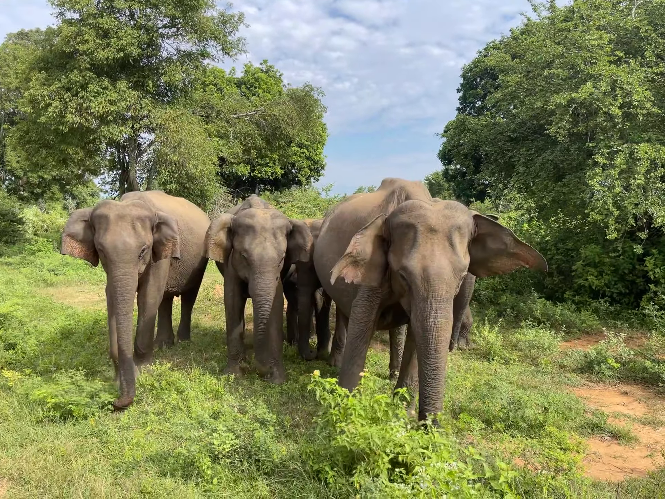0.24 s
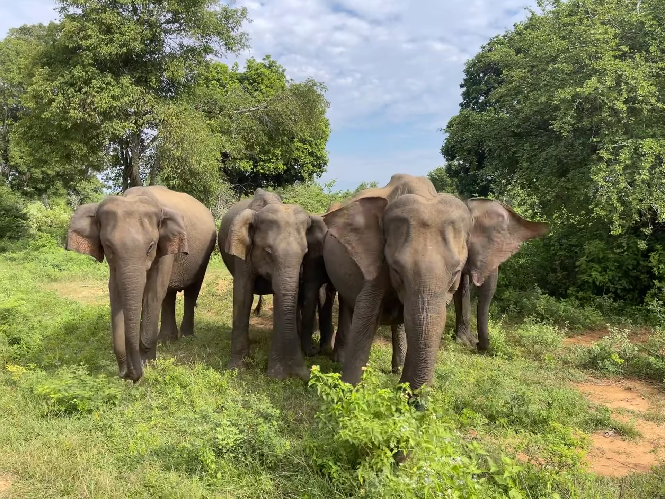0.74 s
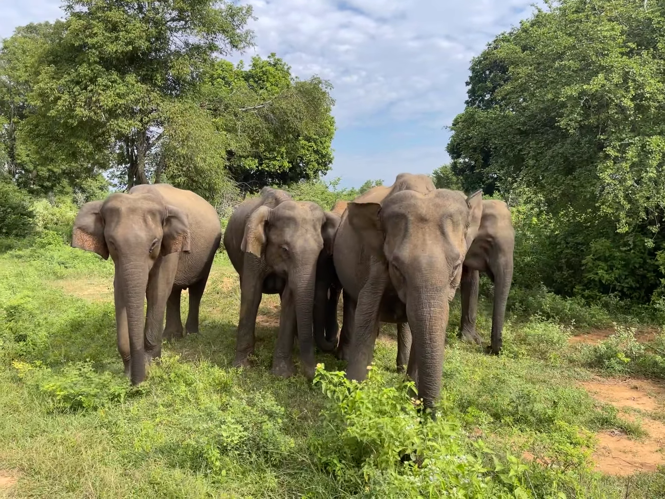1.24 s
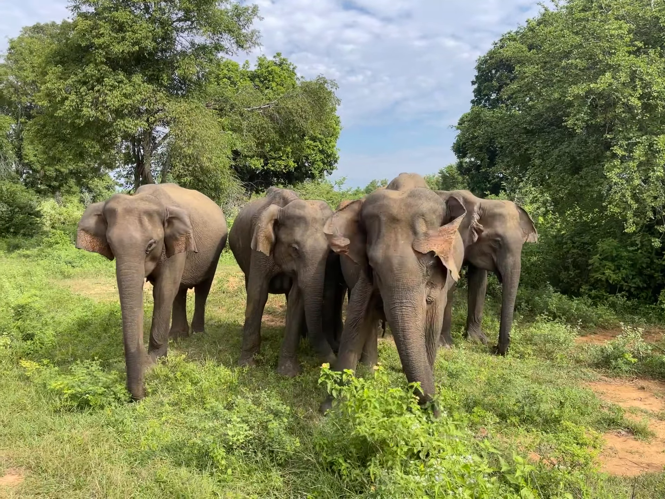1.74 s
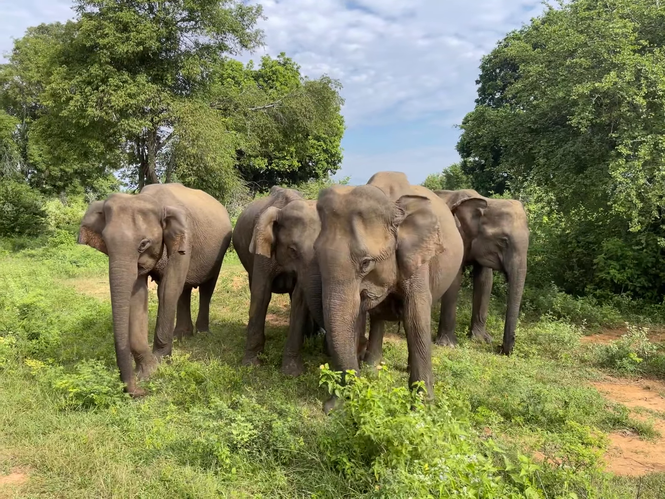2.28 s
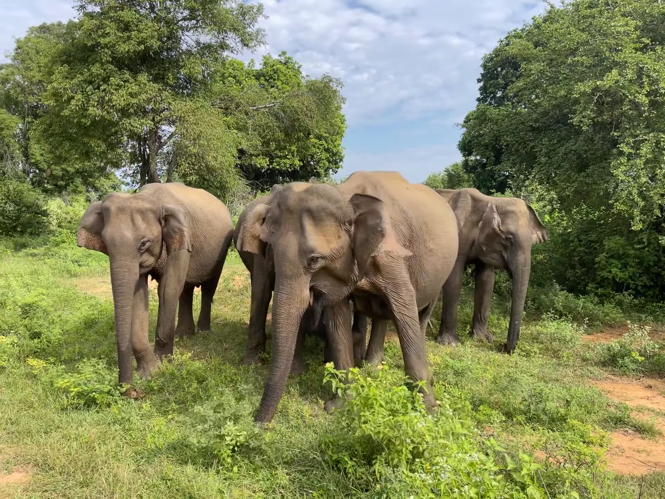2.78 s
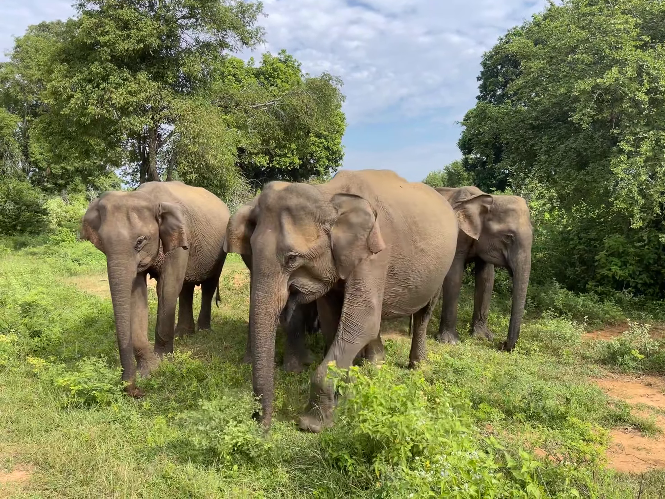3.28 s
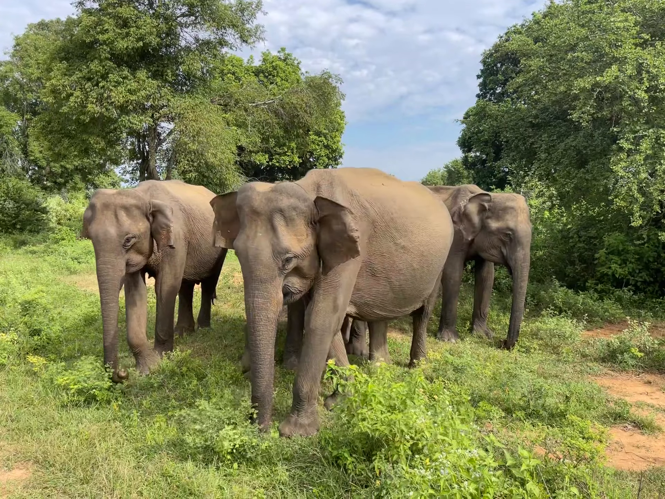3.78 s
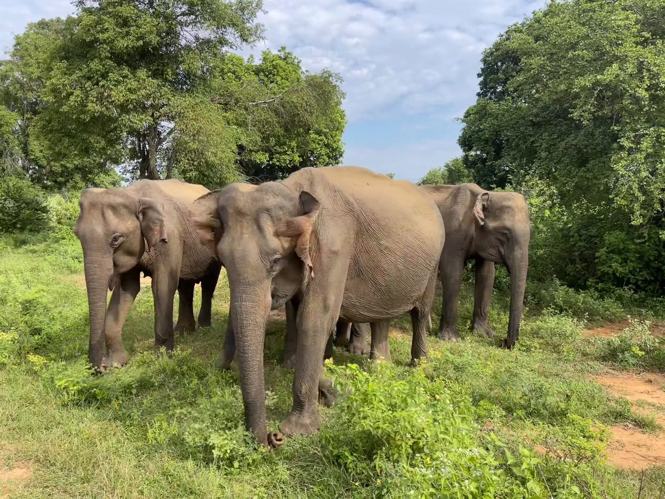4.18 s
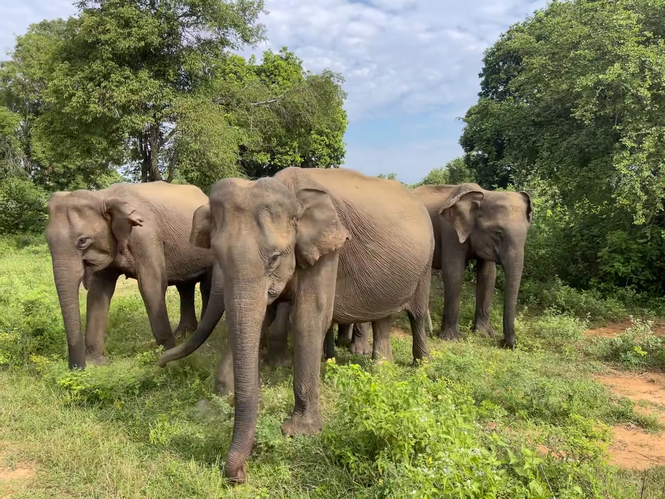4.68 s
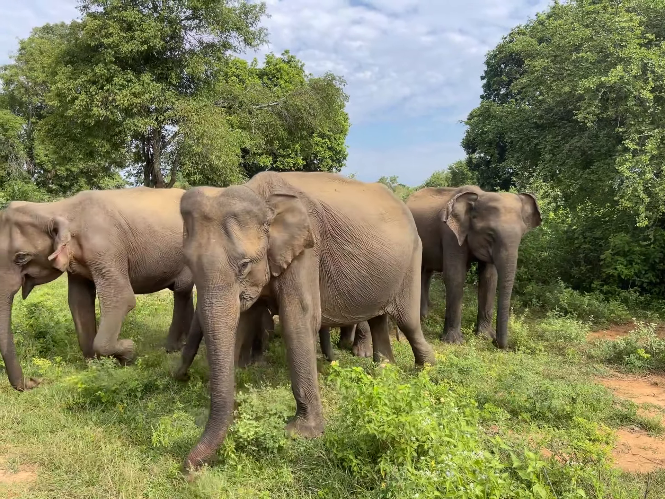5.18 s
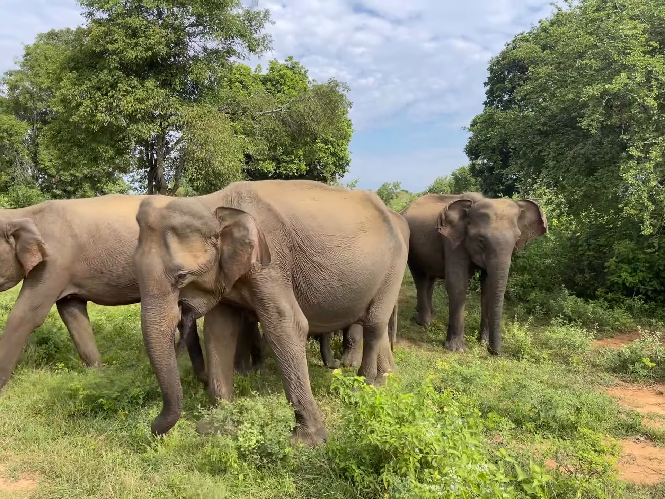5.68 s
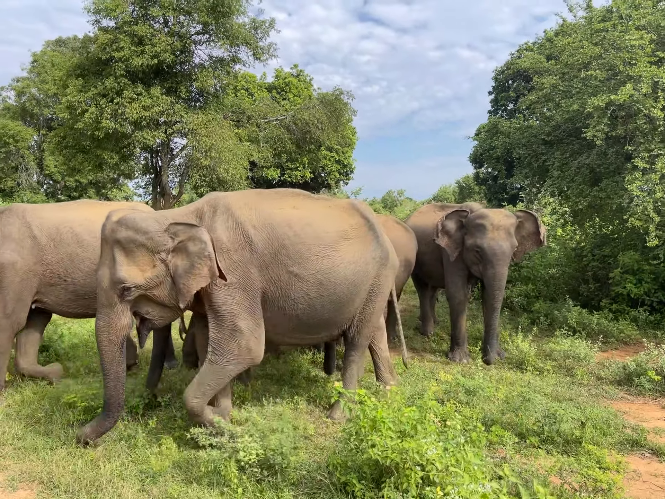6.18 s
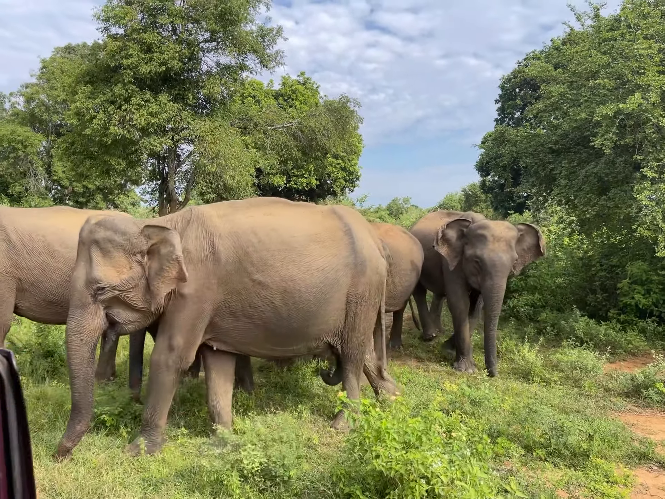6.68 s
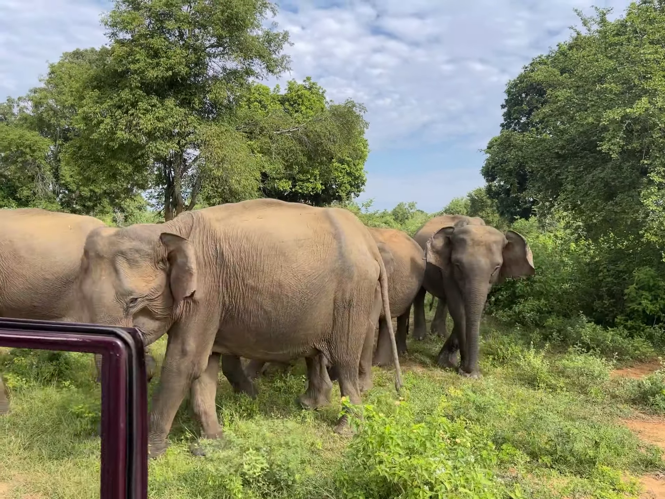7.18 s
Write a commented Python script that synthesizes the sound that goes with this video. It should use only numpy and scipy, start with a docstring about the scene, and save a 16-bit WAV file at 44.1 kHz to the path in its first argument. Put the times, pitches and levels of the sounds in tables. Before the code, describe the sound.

Elephants give short falling squeaks and deep pulsing rumbles, ears slap, birds chirp and whistle, and a vehicle door unlatches sharply close by.

```python
"""A small herd of elephants grazes in scrub: buzzing lips squeak in falling notes, ears slap hide with noise
bursts and thuds, and two animals rumble in slow pulses of harmonics coloured by throat and trunk.
Small birds chirp in the bushes and one repeats a high rising whistle, all as tones on gliding pitch paths.
Near the end the door of a parked vehicle is unlatched close by: noise bursts and a ringing panel.
Dull low bumps are heard too, and filtered noise makes the low air, the brushing and the rustling grass."""
import sys
import numpy as np
from scipy import signal
from scipy.fft import rfft, irfft
from scipy.io import wavfile
from scipy.ndimage import map_coordinates

SR = 44100
rng = np.random.default_rng(int(sys.argv[2]) if len(sys.argv) > 2 else 0)


def transcribe(u):
    """Save the signal u as a 16-bit wav file named by the first command-line argument.

    u: samples, shape (n,) or (channels, n), limited to [-1, 1]; the rate is SR.
    q: integer samples, one column per channel.
    """
    v = np.clip(np.atleast_2d(u).T, -1, 1)
    q = np.round(v * 32767).astype(np.int16)
    wavfile.write(sys.argv[1], SR, q)


N = 327574  # samples
TIME = np.arange(N) / SR  # s
EDGE_HZ = 15900  # upper band limit

# Spectral envelope of the squeaks. Each row: frequency in Hz, level in dB.
SQUEAK_COLOUR = [(400, -36), (560, -32), (700, -1.5), (1000, 0.5), (1700, -0.5), (2600, -5), (3400, -6.5),
                 (4600, -12.5), (6500, -18.5), (10000, -28.5), (15000, -38)]
SQUEAK_BEND, SQUEAK_REBOUND_POWER = 1.35, 1.5  # shape of the fall (radians of a sine) and of the rebound
SQUEAK_ENDS_DB, SQUEAK_SWELL_POWER = -12, 2.15  # level at the ends relative to the peak; flatness near the peak


def squeak(length, dip_s, dip_hz, fall, rebound, db, peak, rough_from, rough_to, bright_db,
           jitter=0.0055, rasp=0.0447, doubling=0.35):
    """Lip-reed oscillation: pressed lips buzz and sag in pitch; irregular flapping smears harmonics and hisses."""
    t = np.arange(0, length, 1 / SR)
    hz = dip_hz * 2 ** glide(t, dip_s, fall, rebound, SQUEAK_BEND, SQUEAK_REBOUND_POWER)
    level_db = db + SQUEAK_ENDS_DB * arch(t / length, peak, SQUEAK_SWELL_POWER)
    rough = np.clip(np.linspace(rough_from, rough_to, len(t)), 0, 1)
    hz = hz * (1 + jitter * wander(len(t), 68.5) + rasp * rough * wander(len(t), 319.5))

    # each opening comes a little early or late, blurring the upper harmonics most; bright squeaks are steadier
    stagger_depth = (0.07 + 0.2 * rough) / (1 + (bright_db / 7) ** 2)  # radians
    stagger = stagger_depth * wander(len(t), 450)
    phase = 2 * np.pi * np.cumsum(hz) / SR
    # in hoarse stretches long and short cycles alternate, adding lines between the harmonics
    alternation = doubling * rough * np.sin(phase / 2 + wander(len(t), 37.8))
    phase = phase + stagger + alternation

    partials = np.arange(1, 20)[:, None] * hz
    gains = amp(read(SQUEAK_COLOUR, partials) + bright_db * np.log2(partials / hz)) * (partials < EDGE_HZ)
    gains /= np.sqrt((gains ** 2).sum(0))
    buzz = np.zeros(len(t))
    for k, gain in enumerate(gains, start=1):
        flicker = amp(2.8 * wander(len(t), 34.4))
        buzz += gain * flicker * np.sin(k * phase)
    # air hisses through once in every cycle
    puffs = rng.standard_normal(len(t)) * (1 + np.cos(phase))
    hiss = colour(puffs, SQUEAK_COLOUR, bright_db)
    hiss_share = np.clip(0.6 * rough ** 3, 0, 1)  # of the power
    voice = np.sqrt(1 - hiss_share) * unit(buzz) + np.sqrt(hiss_share) * hiss
    flutter = amp(3.7 * rough * wander(len(t), 135.6))
    return amp(level_db) * voice * flutter * signal.windows.tukey(len(t), 0.08)


RUMBLE_ATTACK_S, RUMBLE_RELEASE_S = 0.17, 0.18
RUMBLE_DRIFT = 0.02486  # slow pitch drift as a share of the pitch


def rumble(length, pitch_hz, db, throat):
    """Source-filter principle: very slow pulses of the vocal folds ring the long throat and trunk."""
    t = np.arange(0, length, 1 / SR)
    hz = pitch_hz * (1 + RUMBLE_DRIFT * wander(len(t), 1))
    turns = np.cumsum(hz * (1 + 0.003 * wander(len(t), 5))) / SR
    folds = np.zeros(len(t))
    for k in range(2, 26):
        # the throat delays each harmonic a little, so a pulse is a short thrum
        delay = 0.31 * rng.random()
        folds += amp(read(throat, k * hz)) * np.cos(2 * np.pi * (k * turns + delay))
    level = amp(db + 1.9 * wander(len(t), 5.1))
    return level * unit(folds) * held(t, length, RUMBLE_ATTACK_S, RUMBLE_RELEASE_S)


# Elephant squeaks. Each row: start in seconds, length in seconds, time to the lowest pitch in seconds,
# lowest pitch in Hz, fall into it in octaves, rebound in octaves, level in dB, loudest point as a share
# of the length, roughness (0-1) at the start, roughness (0-1) at the end, brightness in dB per octave.
SQUEAKS = [ (1.102, .1, 0.051, 841, .27, 0.098, -42, 0.28, 0.46, 0.7, 3),
           (1.378, 0.12, 0.051, 1122, .22, 0, -49, 0.2, 0.37, 0.49, 4.5),
           (1.62, .16, 0.089, 1015, 0.41, .092, -45.5, .4, 0.65, 0.12, 0.5),
           (1.65, 0.084, 0.034, 876, 0.11, 0.29, -42.5, 0.29, 0.67, 0.55, 1),
           (2.428, 0.13, 0.081, 1321, 0.25, 0.2, -44.5, 0.39, 0.22, 0.29, .5),
           (2.518, 0.1, 0.11, 1197, 0.24, 0, -43.5, 0.64, 0.86, 0.66, 2),
           (2.584, 0.069, 0.038, 869, .18, 0.37, -42.5, 0.36, 0.77, 0.54, .5),
           (2.904, 0.15, 0.12, 815, 0.34, 0.16, -42, 0.4, 0, .06, 2),
           (3.265, 0.1, 0.029, 955, 0.073, .12, -47, 0.25, 0, .15, 1),
           (3.332, .16, .048, 1006, 0, 0.021, -52.5, 0.3, 0.65, 1, 1.5),
           (3.592, .16, 0.13, 870, 0.094, .1, -49.5, 0.34, 0, .03, 1.5),
           (3.951, .14, 0.094, 828, 0.16, 0.11, -47.5, .55, 0, .05, 2.5),
           (4.266, 0.15, 0.086, 706, 0.29, 0.21, -45, 0.26, 0, 0.065, 0.5),
           (5.097, 0.11, .105, 1337, 0.07, 0.084, -55.5, .79, 0.37, 0.34, 4),
           (5.185, 0.13, 0.072, 1089, 0.39, 0.019, -41, .5, 0, 0.35, 2),
           (5.488, 0.09, .045, 1018, .31, 0.033, -44, 0.57, 0.16, .24, 0),
           (5.547, .12, 0.052, 716, .52, 0.3, -41.5, 0.18, 0.28, 0.77, -0.5),
           (5.828, 0.16, 0.097, 695.4, .46, 0.11, -42.5, 0.4, 0.05, 0.21, 0.5),
           (6.319, 0.13, .086, 630.5, 0.53, 0, -47, .5, 0.3, 0.45, 5.5),
           (6.45, 0.1, 0.09, 647, .09, 0, -52, .49, 0.07, 0.2, -1),
           (7.097, 0.087, 0.039, 1267, .23, 0.33, -45, .45, 0.3, .15, 10),
           (7.166, 0.07, .072, 1430, 0.13, 0, -49.5, 0.54, 0, .1, 10),
           (7.207, 0.16, 0.075, 1164, 0.39, 0.3, -44.5, 0.36, 0.05, .18, 9), ]
# One row a rumbling elephant. Each row: start in seconds, length in seconds, pitch in Hz,
# level in dB before mixing.
RUMBLES = [(1.198, 3.648, 18.9, -61), (1.25, 3.444, 14.1, -59.5)]
# Throat and trunk response, one list a rumbling elephant. Each row: frequency in Hz, level in dB.
THROATS = [
    [(38, -28), (56, -2.5), (75, -22), (112, -11.5), (131, -19), (150, 4), (170, -31), (207, -6.5),
     (226, -3), (245, -9.5), (263, -2), (300, -29), (450, -65)],
    [(42, -13), (70, -6), (99, -6), (120, -11), (141, 2.5), (162, -6), (183, -3.5), (215, -18),
     (350, -38.5)],
]


def elephants():
    """Superposition: the squeaks with their scattered echo, and the two rumbles without one."""
    high, low = np.zeros((2, N))
    for s, *shape in SQUEAKS:
        add(high, s, squeak(*shape))
    for (s, *shape), throat in zip(RUMBLES, THROATS):
        add(low, s, rumble(*shape, throat))
    return high + amp(-8.0) * bushes(high, t60=0.15, first=0.0083) + amp(-1.0) * low


# Ears slapping hide. Each row: start in seconds, crack in dB, slap in dB, thud of trapped air in dB,
# thud pitch in Hz.
FLAPS = [(.397, -41, -42, -45, 330), (.412, -52, -37, -38, 327), (0.4184, -38, -34, -32, 314),
         (0.565, -45, -48.5, -65, 297), (0.901, -41.5, -49, -52, 161), (0.992, -65, -40.5, -58, 297),
         (1, -61, -38, -47, 315), (1.024, -38, -38, -46, 290), (1.082, -43, -41, -40.5, 263),
         (1.562, -62, -44, -51, 259), (1.569, -47, -36.5, -31.5, 254), (2.094, -60, -44.5, -43.5, 306),
         (2.109, -49, -50, -66, 300), (6.163, -51, -36.5, -63, 250), (6.73, -44.5, -52, -59, 302),
         (6.845, -48, -37.5, -39, 308)]
# Spectrum of a sharp crack. Each row: frequency in Hz, level in dB.
CRACK = [(1000, 3.5), (2500, 0), (4000, 2.5), (7000, 7.5), (10500, 0.5), (13000, -15), (16000, -17)]
# Spectrum of a flat slap. Each row: frequency in Hz, level in dB.
SLAP = [(100, 2), (400, -2), (800, 0.5), (1300, -2), (2200, -5.5), (4000, -12.5), (9000, -25)]


def ears():
    """Impact and air displacement: an ear cracks against the shoulder and squeezes out a thud of air."""
    flaps = np.zeros(N)
    t = np.arange(SR // 4) / SR
    swell = t / 0.0031  # the thud's envelope peaks after 3.1 ms
    for s, crack_db, slap_db, thud_db, hz in FLAPS:
        crack = amp(crack_db) * burst(CRACK, t60=0.023, rise=0.00082)
        slap = amp(slap_db) * burst(SLAP, t60=0.068, rise=0.00052)
        thud = amp(thud_db) * swell * np.exp(1 - swell) * np.sin(2 * np.pi * hz * t)
        add(flaps, s, crack + slap)
        add(flaps, s + 0.0021, thud)
    return flaps + amp(-7) * bushes(flaps, t60=0.19, first=0.0076)


# Dull low bumps. Each row: start in seconds, length in seconds, pitch in Hz, level in dB.
BUMPS = [(.88, 0.076, 148, -53.5), (2.228, 0.07, 344, -62), (3.519, 0.065, 300, -61),
         (5.182, 0.13, 133.5, -53), (5.756, 0.17, 85.4, -55), (5.981, 0.47, 99, -55),
         (6.385, 0.145, 203.6, -46), (6.93, 0.08, 163, -49.5), (7.244, 0.14, 75, -47)]


def low_bumps():
    """Frequency modulation: a random waver broadens each low tone into a dull bump."""
    bumps = np.zeros(N)
    for s, length, hz, db in BUMPS:
        path_hz = np.full(int(length * SR), hz)
        add(bumps, s, amp(db) * note(path_hz, waver=0.071, rate=32, taper=0.87))
    return bumps


# The latch and its knocks. Each row: start in seconds, crack in dB, clack in dB, panel in dB.
DOOR = [(6.2025, -57, -34, -33), (6.2102, -24.5, -28, -37), (6.2212, -43, -25, -57),
        (6.228, -51, -46, -26.5), (6.245, -58, -33, -39), (6.336, -45.5, -62, -65),
        (6.406, -47, -38.5, -46)]
# Vibration modes of the door panel. Each row: frequency in Hz, level in dB, t60 in seconds.
PANEL = [(69.6, -11, 0.3), (112, -14.5, 0.27), (177, -18, .3), (230, -8.5, 0.16), (302, -2, 0.14),
         (449, 1, 0.078), (757, -8, 0.15), (1257, 1.5, 0.058)]


def door():
    """Impact and modal decay: the latch snaps, the bolt clacks, and the panel booms in its modes."""
    out, t = np.zeros(N), np.arange(SR // 2) / SR
    panel = np.zeros(len(t))
    for hz, db, t60 in PANEL:
        panel += amp(db) * np.exp(-np.log(1000) * t / t60) * np.sin(2 * np.pi * hz * t)
    for s, crack_db, clack_db, panel_db in DOOR:
        crack = amp(crack_db) * burst(CRACK, t60=0.042, rise=0.00023)
        clack = amp(clack_db) * burst(SLAP, t60=0.056, rise=0.00054)
        add(out, s, crack + clack + amp(panel_db) * panel)
    return out + amp(-11) * bushes(out, t60=0.26, first=0.01)


# Rising whistles. Each row: start in seconds, length in seconds, top pitch in Hz, level in dB before mixing.
WHISTLES = [(3.584, 0.38, 7730, -67), (3.938, 0.4, 7490, -57), (4.369, .41, 7590, -52.5),
            (4.803, 0.38, 7540, -50), (5.252, .42, 7520, -52), (5.723, .42, 7460, -54.5),
            (6.219, .415, 7330, -54), (6.745, .38, 7340, -55.5), (7.24, .46, 7350, -55)]
WHISTLE_TOP_AT = 0.89  # share of the length at which pitch and level peak
WHISTLE_CLIMB_OCT, WHISTLE_DROP_OCT = 0.27, 0.15
WHISTLE_BEND = 1  # shape of the climb, radians of a sine
WHISTLE_ENDS_DB, WHISTLE_SWELL_POWER = -4.5, 1.56  # level at the ends relative to the peak; flatness near it
WHISTLE_TRILL, TRILL_PER_OCT = 0.0018, 0.061  # share of the pitch: at the top, and added per octave below it


def whistler():
    """Frequency modulation: a high tone trills as it rises and steadies at the top."""
    direct = np.zeros(N)
    for s, length, hz, db in WHISTLES:
        u = np.linspace(0, 1, int(length * SR))
        below = glide(u, WHISTLE_TOP_AT, WHISTLE_CLIMB_OCT, WHISTLE_DROP_OCT, WHISTLE_BEND, power=1.45)
        trill = WHISTLE_TRILL + TRILL_PER_OCT * below
        tone = note(hz * 2 ** -below, waver=trill, rate=250, taper=0.038)
        level_db = db + WHISTLE_ENDS_DB * arch(u, WHISTLE_TOP_AT, WHISTLE_SWELL_POWER)
        add(direct, s, amp(level_db) * tone)
    return amp(-2.5) * direct + amp(-2.0) * bushes(direct, t60=0.29, first=0.004)


# One bird's quick upward flicks. Each row: start in seconds, last pitch in Hz, level in dB.
FLICKS = [(.135, 5450, -54), (.367, 4500, -54), (.597, 4630, -53.5), (.826, 4320, -55), (.94, 4520, -56),
          (1.062, 4790, -51.5), (1.297, 5050, -53), (1.518, 4770, -55)]
FLICK_S, FLICK_FROM_HZ = 0.02305, 3450
# Soft, slightly rising pips. Each row: start in seconds, level in dB.
PIPS = [(.068, -61.5), (.166, -61), (.27, -60.5), (.583, -57), (.688, -61), (3.52, -61.5), (3.736, -57),
        (3.852, -62)]
PIP_S, PIP_FROM_HZ, PIP_TO_HZ = 0.029, 3470, 3680
# Level or falling notes. Each row: start in seconds, length in seconds, first pitch in Hz,
# last pitch in Hz, level in dB.
SLURS = [(.112, 0.085, 5220, 4250, -61), (0.479, 0.28, 3760, 2870, -59.5), (0.949, 0.18, 4550, 4550, -58),
         (1.333, 0.04, 3400, 3300, -58.5), (1.538, 0.028, 4610, 3590, -57), (2.4, 0.071, 3180, 2880, -62),
         (2.81, 0.067, 2990, 2860, -66)]
# Even runs of falling ticks. Each row: first start in seconds, last start in seconds, level in dB.
TICK_RUNS = [(3.148, 3.885, -60), (6.555, 6.875, -59)]
TICK_S, TICK_FROM_HZ, TICK_TO_HZ = 0.021, 5010, 4130
TICK_GAP_S = 0.105  # about; the ticks fill each run evenly


def small_birds():
    """Frequency glide: short sliding tones from birds in the bushes, with echoes off the foliage."""
    near = np.zeros(N)
    for s, last_hz, db in FLICKS:
        add(near, s, chirp(FLICK_S, FLICK_FROM_HZ, last_hz, db))
    for s, db in PIPS:
        add(near, s, chirp(PIP_S, PIP_FROM_HZ, PIP_TO_HZ, db))
    for s, db in repeats(TICK_RUNS, TICK_GAP_S):
        add(near, s, chirp(TICK_S, TICK_FROM_HZ, TICK_TO_HZ, db))
    for s, *slur in SLURS:
        add(near, s, chirp(*slur))
    return near + amp(-8.0) * bushes(near, t60=0.36, first=0.0024)


# Even runs of a farther bird's chips. Each row: first start in seconds, last start in seconds,
# level in dB before mixing.
CHIP_RUNS = [(3.17, 3.4, -53), (3.595, 4.725, -52), (4.93, 5.32, -52), (5.755, 5.955, -53),
             (6.5, 6.71, -50.5), (6.93, 7.09, -53.5)]
CHIP_GAP_S = 0.195  # about; the chips fill each run evenly
CHIP_S, CHIP_FROM_HZ, CHIP_TO_HZ = 0.0499, 3950, 3547
CHIP_BUZZ = 0.0383  # share of the pitch


def chips():
    """Multiple scattering: foliage blurs a farther bird's buzzy, falling chips."""
    far = np.zeros(N)
    sag_hz = np.geomspace(CHIP_FROM_HZ, CHIP_TO_HZ, int(CHIP_S * SR))
    for s, db in repeats(CHIP_RUNS, CHIP_GAP_S):
        add(far, s, amp(db) * note(sag_hz, waver=CHIP_BUZZ, rate=280, taper=0.3))
    return amp(-5) * far + amp(-7.5) * bushes(far, t60=0.12, first=0.004)


# Grass pulled or trodden. Each row: start in seconds, length in seconds, rustle in dB before mixing.
TUGS = [(0, 0.46, -70.5), (0.31, 0.42, -63.5), (0.685, 0.25, -57), (0.864, 0.39, -67.5), (1.128, 0.15, -58),
        (1.474, 0.65, -63), (2.12, 0.28, -62), (2.272, 0.17, -58), (2.4, 0.34, -63), (2.74, 0.58, -66.5),
        (3.283, 0.26, -61), (3.623, 0.15, -78), (3.974, 0.53, -71), (4.235, .68, -64), (4.918, 0.15, -68),
        (5.166, 0.56, -61), (5.644, 0.94, -63.5), (6.286, 0.36, -62), (6.584, 0.49, -64.5),
        (6.988, 0.24, -60.5), (7.31, .25, -66.5)]
TUG_ATTACK_S, TUG_RELEASE_S = 0.037, 0.11
# Spectrum of rustling grass. Each row: frequency in Hz, level in dB.
GRASS = [(600, -10.5), (1500, 0), (3000, 0), (4200, 1), (6500, 1), (8500, -4.5), (11200, -0.5), (12200, -7),
         (16000, -4)]
STILL_GRASS_DB = -75.5  # before mixing


def grass(crackles_per_s=260, spread_db=6.5):
    """Random pulse process: pulled grass is a fluctuating hiss plus sparse crackles of uneven strength."""
    power = amp(STILL_GRASS_DB) ** 2
    for s, length, db in TUGS:
        power = power + (amp(db) * held(TIME - s, length, TUG_ATTACK_S, TUG_RELEASE_S)) ** 2
    strength = amp(spread_db * np.minimum(rng.exponential(1, N), 4))
    snaps = (rng.random(N) < crackles_per_s / SR) * rng.choice([-1, 1], N) * strength
    blades = signal.oaconvolve(snaps, burst(CRACK, t60=0.0084, rise=0.00044))[:N]
    hiss = colour(rng.standard_normal(N), GRASS) * amp(2.0 * wander(N, 22))
    rustle = hiss + amp(-11) * colour(blades, GRASS)
    return amp(6.0) * np.sqrt(power) * rustle


# Heavy bodies shifting among the bushes. Each row: peak time in seconds, build-up in seconds,
# dying away in seconds, low air in dB before mixing, brushing in dB before mixing.
SHIFTS = [(1.3, 0.35, 0.52, -64.5, -64.5), (3.47, .15, 0.088, -71, -64.5), (5.0, .2, 0.87, -72, -69.5),
          (6.33, 0.36, 0.18, -50.5, -55), (7.02, 0.18, 0.096, -63, -65)]
# Spectrum of the low air. Each row: frequency in Hz, level in dB.
LOW_AIR = [(20, -36), (38, -11), (55, -8), (75, -0.5), (130, -0.5), (250, -2.5), (400, -15.5), (900, -57)]
# Spectrum of bodies brushing the bushes. Each row: frequency in Hz, level in dB.
BRUSH = [(150, -2), (350, 4), (550, -0.5), (900, 4), (1500, -10.5), (3000, -7.5), (6000, -67)]
STILL_AIR_DB, STILL_BRUSH_DB = -70, -75.5  # before mixing


def shifting_bodies():
    """Addition of powers: low air and brushing noise swell over a still floor as bodies move."""
    air_power, brush_power = amp(STILL_AIR_DB) ** 2, amp(STILL_BRUSH_DB) ** 2
    for s, build, decay, air_db, brush_db in SHIFTS:
        swell = np.exp(-np.maximum((s - TIME) / build, (TIME - s) / decay))
        air_power = air_power + (amp(air_db) * swell) ** 2
        brush_power = brush_power + (amp(brush_db) * swell) ** 2
    air = colour(rng.standard_normal(N), LOW_AIR)
    brush = colour(rng.standard_normal(N), BRUSH) * amp(3.7 * wander(N, 14))
    return amp(5.5) * np.sqrt(air_power) * air + amp(4.0) * np.sqrt(brush_power) * brush


# Spectrum of the far birds' wash. Each row: frequency in Hz, level in dB.
FAR_BIRDS = [(300, -10), (1000, -2), (2200, -4.5), (3500, 1), (4600, -3.5), (6000, -6.5), (10000, -12.5),
             (16000, -54)]


def far_birds():
    """Diffuse sound: far birds merge into a steady wash of coloured noise."""
    return amp(-61.0) * colour(rng.standard_normal(N), FAR_BIRDS)


def bushes(x, t60, first, size=32768):
    """Scattering: foliage returns sparse, dying echoes of either sign, after a first delay in seconds."""
    t = np.arange(size) / SR
    sparse = rng.choice([-1, 1], size) * (rng.random(size) < 1 / 16)
    taps = sparse * (t > first) * np.exp(-np.log(1000) * t / t60)
    return signal.oaconvolve(x, taps / np.linalg.norm(taps))[:N]


def note(hz, waver, rate, taper):
    """Phase is the integral of frequency: a pure tone follows a pitch path with a random quiver."""
    phase = 2 * np.pi * np.cumsum(hz * (1 + waver * wander(len(hz), rate))) / SR
    return np.sqrt(2) * np.sin(phase) * signal.windows.tukey(len(hz), taper)


def chirp(length, first_hz, last_hz, db):
    """Exponential glide: a small bird's note slides evenly in octaves between two pitches."""
    path_hz = np.geomspace(first_hz, last_hz, int(length * SR))
    return amp(db) * note(path_hz, waver=0.0037, rate=79, taper=0.16)


def burst(points, t60, rise, size=SR // 2):
    """Exponential decay: a short noisy contact rises fast and dies away."""
    t = np.arange(size) / SR
    noise = colour(rng.standard_normal(size), points)
    return noise * (1 - np.exp(-t / rise)) * np.exp(-np.log(1000) * t / t60)


def glide(t, turn, before, after, bend, power):
    """Pitch contour: octaves from the turning pitch, an S-shaped approach and then a curved departure."""
    approach = (np.sin(bend * np.maximum(1 - t / turn, 0)) / np.sin(bend)) ** 2
    departure = (np.maximum(t - turn, 0) / max(t[-1] - turn, 1e-3)) ** power
    return before * approach + after * departure


def arch(u, peak, power):
    """Amplitude contour: 0 at the peak of a call, 1 at both its ends; u runs from 0 to 1."""
    peak = np.clip(peak, 0.05, 0.95)
    return np.maximum(1 - u / peak, (u - peak) / (1 - peak)) ** power


def held(t, length, attack, release):
    """Amplitude envelope: linear attack, hold and release within the given length."""
    return np.clip(np.minimum(t / attack, (length - t) / release), 0, 1)


def repeats(runs, gap):
    """Periodic rhythm: the (start in s, dB) of every note in evenly spaced runs."""
    notes = []
    for first, last, db in runs:
        count = round((last - first) / gap) + 1
        notes += [(s, db) for s in np.linspace(first, last, count)]
    return notes


def wander(size, rate):
    """Band-limited chance: a smooth random curve of rms about 1 that moves up to rate times a second."""
    knots = rng.standard_normal(int(size / SR * rate * 2) + 4)
    return map_coordinates(knots, [1 + np.arange(size) / SR * rate * 2], order=3)


def colour(x, points, tilt_db=0):
    """Linear filtering: shapes x by a spectrum, tilted in dB per octave, at rms 1."""
    hz = np.fft.rfftfreq(len(x), 1 / SR)
    gain = amp(read(points, hz) + tilt_db * np.log2(hz + 1))
    return unit(irfft(rfft(x) * gain, len(x)))


def read(points, hz):
    """Logarithmic frequency scale: interpolates a spectrum between its points."""
    f, value = np.transpose(points)
    return np.interp(np.log(hz + 1), np.log(f), value)


def amp(db):
    """Decibel scale: turns a level into an amplitude gain."""
    return 10 ** (np.asarray(db) / 20)


def unit(x):
    """Root-mean-square level: scales x to rms 1."""
    return x / np.sqrt(np.mean(x ** 2) + 1e-20)


def add(mix, s, sound):
    """Superposition: mixes a sound in, in place, at time s."""
    part = mix[max(round(s * SR), 0):][:len(sound)]
    part += sound[:len(part)]


def scene():
    """Superposition: the pressures of all sources sum at one microphone."""
    herd = elephants() + ears() + low_bumps()
    birds = whistler() + small_birds() + chips()
    scrub = grass() + shifting_bodies() + far_birds()
    return (herd + door() + birds + scrub)[None]


def record(dry):
    """Band limiting: the microphone drops the deepest bass, then a steep low-pass cuts the top."""
    high_pass = signal.butter(4, 48, "high", fs=SR, output="sos")
    thin = signal.sosfilt(high_pass, dry)
    low_pass = signal.firwin(511, EDGE_HZ, window=("kaiser", 9), fs=SR)
    return signal.oaconvolve(thin, low_pass[None], "same")


dry = scene()
out = record(dry)
transcribe(out)
```